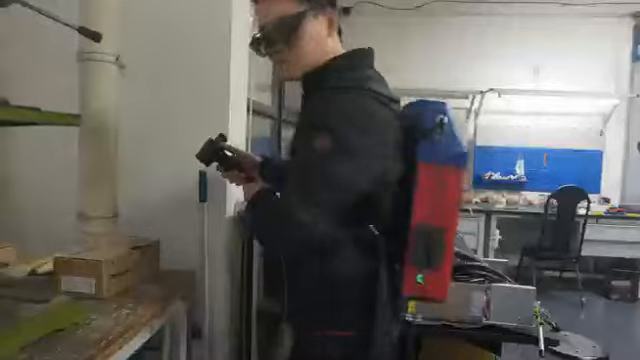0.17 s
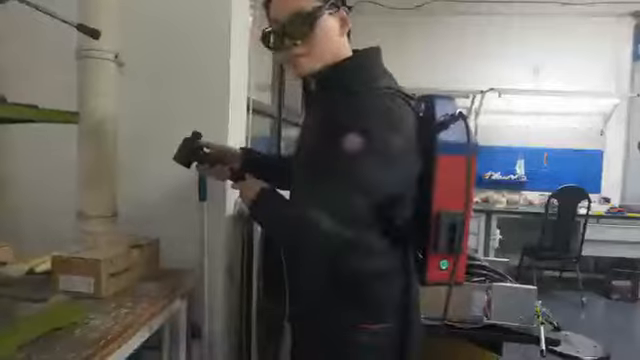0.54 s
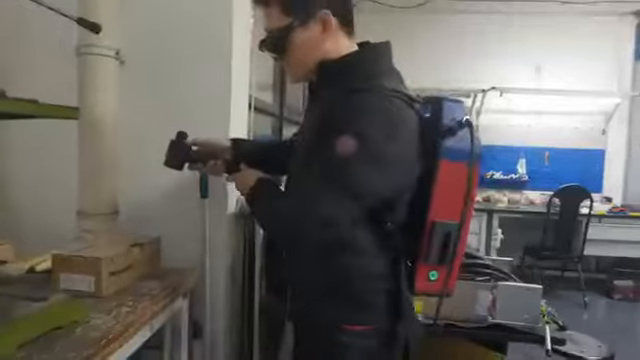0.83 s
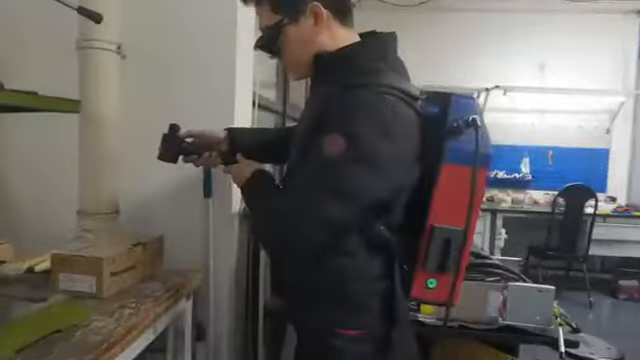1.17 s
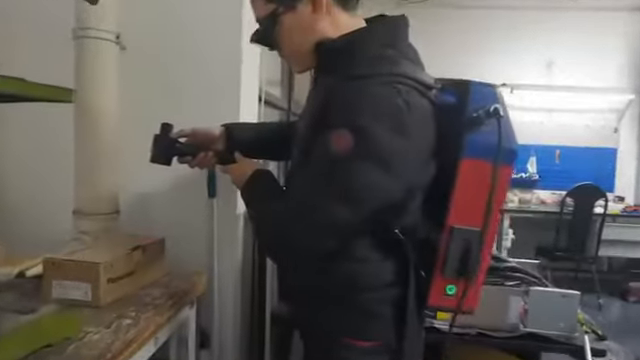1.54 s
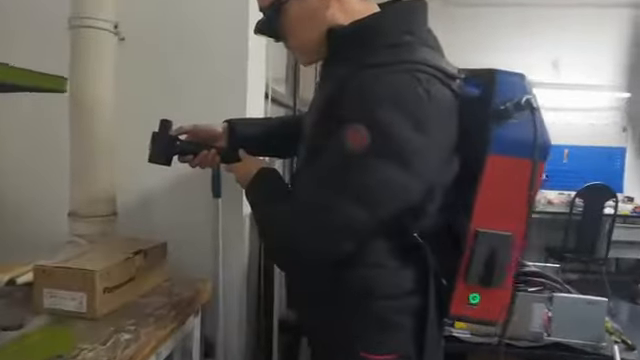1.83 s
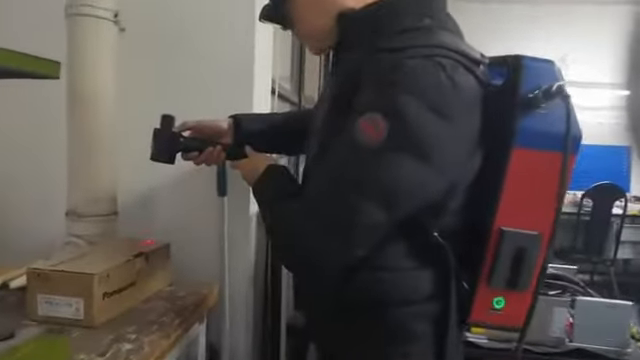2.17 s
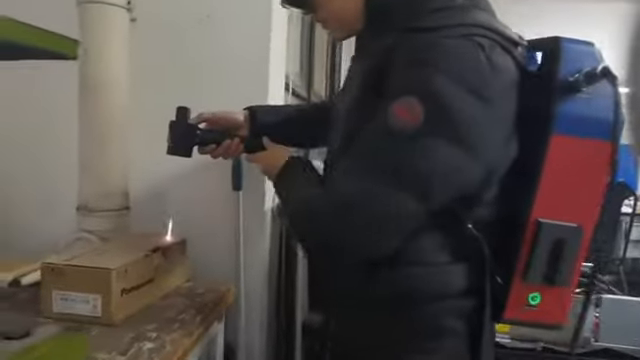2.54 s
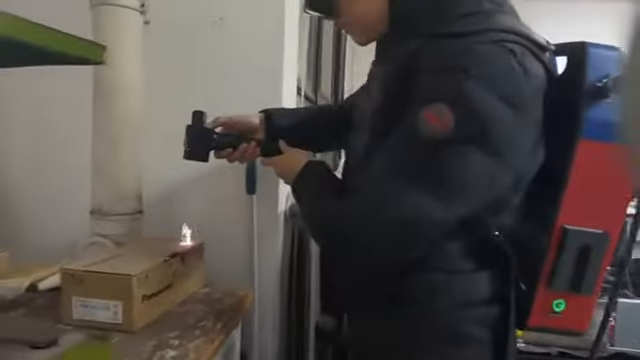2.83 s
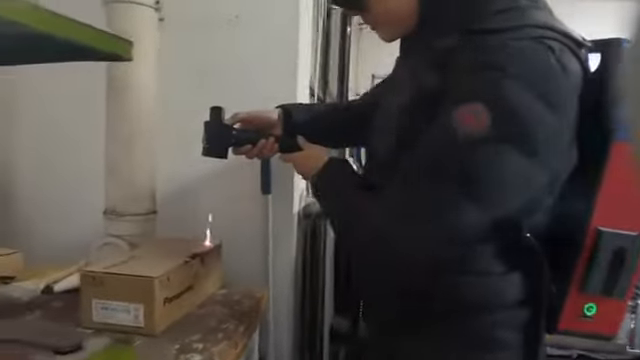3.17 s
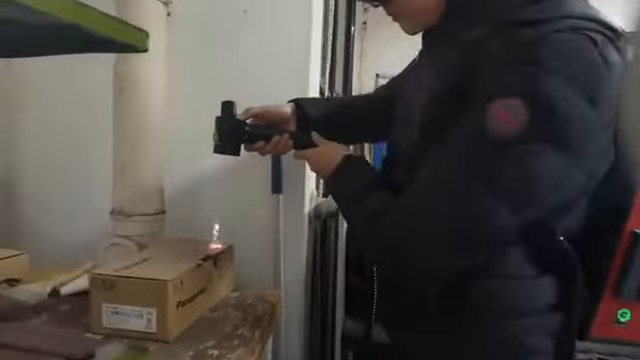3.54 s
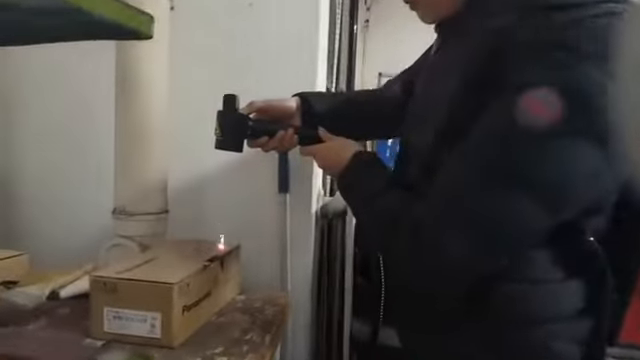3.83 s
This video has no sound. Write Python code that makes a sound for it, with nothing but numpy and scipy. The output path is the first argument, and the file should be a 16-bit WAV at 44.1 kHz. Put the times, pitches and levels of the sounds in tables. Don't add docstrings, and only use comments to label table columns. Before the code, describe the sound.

Laser burning cardboard: a gritty electric buzz starts past halfway, fades, catches again and ends loudest. Before and beneath it, a low pulsing fan hum, thin whine and airy rush in a short, close workshop room.

```python
import sys
import numpy as np
from scipy import signal
from scipy.fft import rfft, irfft, next_fast_len
from scipy.io import wavfile
from scipy.ndimage import uniform_filter1d

SR = 44100
rng = np.random.default_rng(int(sys.argv[2]) if len(sys.argv) > 2 else 0)


def rack_gain(trim_db):
    fader = np.asarray(trim_db, float)
    return 10 ** (fader / 20)


def bounce(signal):
    frames = np.transpose(np.atleast_2d(signal))
    limited = np.clip(frames, -1, 1)
    pcm = np.round(limited * 32767).astype(np.int16)
    wavfile.write(sys.argv[1], SR, pcm)


N = 176400
T = np.arange(N) / SR

# (frequency [Hz], likeness [0 to 1])
LIKENESS = [(70, .97), (130, .84), (280, .85), (600, .7), (1000, .1), (7000, 0), (8500, .9)]


def rms_one(x):
    return x / np.sqrt(np.mean(x ** 2) + 1e-20)


def in_time(rows):
    s, *columns = np.transpose(rows)
    return [np.interp(T, s, column) for column in columns]


def at_hz(points, hz):
    table_hz, values = np.transpose(points)
    return np.interp(np.log(hz), np.log(table_hz), values)


def drift(rate):
    r = np.exp(-80 * np.pi * rate / SR)
    noise = rng.standard_normal(N // 40 + 2002)
    slow = rms_one(signal.lfilter([1], [1, -2 * r, r * r], noise)[2000:])
    return np.interp(np.arange(N) / 40, np.arange(len(slow)), slow)


def filtered(x, response):
    size = next_fast_len(N + SR // 2)
    hz = np.arange(1, size // 2 + 2) * SR / size
    return irfft(rfft(x, size) * response(hz), size)[..., :N]


def pair(mid, side, alike):
    alike = np.clip(alike, 0, 1)
    return np.sqrt((1 + alike) / 2) * mid + np.sqrt((1 - alike) / 2) * side * [[1], [-1]]


def narrow(hz, width_hz):
    shape = lambda f: 1 / (1 + ((f - hz) / width_hz * 2) ** 2)
    mid, side = filtered(rng.standard_normal((2, N)), shape)
    return rms_one(pair(mid, side, at_hz(LIKENESS, hz)))


def air():
    # (frequency [Hz], level [dB per Hz])
    rush_colour = [(25, -15.5), (150, -3.5), (600, -8), (1250, -15), (2300, -18.5), (2900, -21),
                   (6000, -23.5), (7800, -39.5)]
    low_cut_hz = 30

    def share(f, sign):
        colour = rack_gain(at_hz(rush_colour, f) - 41 * (f > 8000)) / (1 + (low_cut_hz / f) ** 4)
        return colour * np.sqrt((1 + sign * np.clip(at_hz(LIKENESS, f), 0, 1)) / 2)

    mid, side = rng.standard_normal((2, N))
    rush = filtered(mid, lambda f: share(f, 1)) + filtered(side, lambda f: share(f, -1)) * [[1], [-1]]
    hiss = filtered(rng.standard_normal((2, N)), lambda f: 1 / (1 + (7000 / f) ** 8))
    rush_db = -49 + 0.5 * T + 0.81 * drift(1.5)
    hiss_db = -67.5 - 1.5 * np.minimum(T, 2.3)
    return rack_gain(rush_db) * rms_one(rush) + rack_gain(hiss_db) * pair(*hiss, 0.9)


def big_fan():
    # (time [s], peak level [dB], pitch [Hz])
    throb = [(0.259, -34.5, 285.4), (0.299, -32.5, 287.4), (0.354, -31, 288.3), (0.409, -41, 274.6),
             (0.477, -32.5, 275), (0.52, -43, 276.5), (0.582, -41, 276.9), (0.653, -48, 280.2),
             (0.699, -37, 285.2), (0.773, -36, 280.3), (0.83, -36.5, 270.2), (0.979, -25.5, 272.6),
             (1.017, -32.2, 285), (1.081, -32, 285.6), (1.136, -31.5, 283.3), (1.174, -30, 288),
             (1.209, -26, 282.3), (1.284, -33.5, 272.6), (1.314, -34, 276), (1.366, -33.5, 273.8),
             (1.423, -36.5, 269), (1.457, -33, 273), (1.492, -34, 282), (1.545, -41, 277.6),
             (1.571, -37, 280), (1.631, -35, 284), (1.683, -45, 273), (1.718, -38, 287), (1.805, -35, 287),
             (1.854, -31.5, 278), (1.888, -33, 279.2), (1.925, -36.5, 284.3), (2.028, -31.5, 278),
             (2.106, -26, 271.5), (2.173, -29.5, 282.2), (2.248, -41.5, 278.2), (2.329, -37.5, 284.8),
             (2.401, -41, 286), (2.565, -35, 284), (2.619, -39, 278.9), (2.732, -43, 296.3),
             (3.009, -37, 281), (3.108, -37.3, 281), (3.195, -32.6, 267.8), (3.285, -37.5, 268.7),
             (3.32, -37.9, 264), (3.372, -37.4, 267.5), (3.441, -32, 269), (3.484, -44, 291),
             (3.589, -39.5, 280), (3.707, -39, 267), (3.85, -33.4, 267.6)]
    gust_s = 0.012
    _, gust_hz = in_time(throb)
    swell = np.sqrt(sum(rack_gain(2 * db) * np.exp(-((T - s) / gust_s) ** 2) for s, db, _ in throb))
    ear_shift = np.array([[-.12], [.12]]) * (1 + drift(2.8))
    gusts = swell * np.sin(2 * np.pi * np.cumsum(gust_hz) / SR + ear_shift)

    housing = narrow(277.2, 63.5)
    blades = rack_gain(-19.5) * narrow(286.3, 1.7)
    rumble_db = -44.5 - 1 * T
    return gusts + rack_gain(rumble_db) * rms_one(housing + blades)


def small_fans():
    # (time [s], first fan level [dB], second fan level [dB])
    whine = [(0.25, -50, -52), (0.33, -47, -44), (0.66, -52, -52), (0.7, -46.5, -48), (1.53, -49.5, -54),
             (1.61, -54, -72), (1.65, -52.5, -61), (2.01, -54, -50), (2.19, -45.5, -44),
             (2.33, -52.5, -47.5), (2.65, -50.5, -39.5), (2.74, -48, -49.5), (2.91, -53, -45),
             (3.03, -45, -40), (3.14, -53, -54), (3.35, -51.5, -40), (3.39, -47.5, -48.5), (4.0, -49, -48)]
    # (frequency [Hz], level at start [dB], level at end [dB], width [Hz])
    tones = [(544, -1, -9, 6.8), (559.2, -1.5, -1.1, 3.77), (587, -0.5, 0.05, 2.5),
             (189.7, -26.5, -11.5, 5.3), (98.6, -25.5, -12, 11.5), (40.5, -20, -9, 13),
             (1650, -17.5, -25, 69), (1740, -20.5, -37, 11), (2246, -19, -24.5, 84),
             (946.5, -21.5, -13, 38)]
    skirt_db, skirt_hz = -9, 36
    squeal_s, squeal_span_s = 2.04, 0.19
    first_fan_db, second_fan_db = in_time(whine)

    squeal_db = -55 - 10 * ((T - squeal_s) / squeal_span_s) ** 2
    total = rack_gain(squeal_db) * narrow(2190, 12)
    for hz, start_db, end_db, width_hz in tones:
        if hz > 900 or hz < 150:
            tone = narrow(hz, width_hz)
        else:
            turns = np.cumsum(hz + width_hz / 2 * drift(3 + width_hz)) / SR
            ear_turns = rng.random((2, 1)) * (1 - at_hz(LIKENESS, hz))
            tone = np.sin(2 * np.pi * (turns + ear_turns)) * np.sqrt(2)
            tone = tone + rack_gain(skirt_db) * narrow(hz, skirt_hz)
        if 500 < hz < 575:
            load_db = first_fan_db
        elif 575 < hz < 700:
            load_db = second_fan_db
        else:
            load_db = -45
        tone_db = start_db + (end_db - start_db) * T / 4 + 1.5 * drift(5)
        total = total + rack_gain(tone_db + load_db) * tone
    return rack_gain([[.5], [-.5]]) * total


def laser():
    # (time [s], level [dB], brightness [dB])
    bouts = [
        [(2.355, -51, 5), (2.373, -32.5, 11), (2.385, -38.5, 0)],
        [(2.385, -38, 10), (2.433, -34.5, 6.5), (2.481, -41.5, 7.5), (2.5, -42, 16)],
        [(2.5, -39, 8.5), (2.666, -33, 8), (2.7, -35, 18)],
        [(2.7, -31.5, 8), (2.83, -36.5, 1), (2.85, -34, 9), (2.932, -42.5, 6), (2.95, -32.5, 3)],
        [(2.95, -34, 7), (2.984, -31.5, 0), (3.022, -38, 3), (3.05, -32, 8)],
        [(3.05, -28, 9), (3.06, -29, 10), (3.1, -37.5, 3)],
        [(3.1, -39, 5), (3.158, -55.5, 17.5), (3.26, -50, 18), (3.286, -56, 15), (3.3, -49, 14)],
    ]
    # (time [s], level [dB], brightness [dB])
    late_bouts = [
        [(3.3, -52, 12), (3.312, -40, 14.5), (3.358, -36.5, 12.5), (3.39, -47, 15), (3.4, -44, 9)],
        [(3.4, -39, 7), (3.406, -36.5, 17), (3.422, -31.5, 8.5), (3.532, -58.5, 14), (3.622, -58, 17),
         (3.68, -58, 25)],
        [(3.68, -53, 16), (3.706, -35.5, 5.5), (3.76, -27.5, 5.5), (3.79, -48.5, -6)],
        [(3.79, -34, 16), (3.8, -30.5, -1), (3.858, -36, 3.5), (3.88, -51, -12)],
        [(3.88, -34, 13), (3.892, -30.5, 5.5), (3.954, -23.5, 4), (4.0, -26, 6.5)],
    ]
    # (frequency [Hz], level [dB per Hz])
    snap_colour = [(700, -16.5), (1300, -3.5), (2200, -3), (2750, 5.5), (3900, 5.5), (6000, 5), (8500, -8),
                   (14800, -1)]
    sweep_hz, sweep_depth = 218.4, 0.1
    memory_low, memory_high, memory_hz = 0.46, 0.2, 8000
    hollow_hz, hollow_width_hz, hollow_db = 2800, 350, -8
    snaps_per_s, snap_spread_db = 10000, 3.1
    bright_hz, patch_db, flicker_db = 9000, 1.1, 2

    rows = [(2.34, -110, 0.018)]
    for bout in bouts + late_bouts:
        rows = rows + list(bout)
    level_db, bright_db = in_time(rows)
    sizes = rack_gain(snap_spread_db * np.minimum(rng.exponential(1, N), 5)) * rng.choice([-1, 1], N)
    snaps = sizes * (rng.random(N) < snaps_per_s / SR)

    def sweeps(f):
        keep = memory_high + (memory_low - memory_high) / (1 + (f / memory_hz) ** 8)
        keep = np.clip(keep, 0, .9)
        hollow = hollow_db / (1 + ((f - hollow_hz) / hollow_width_hz) ** 4)
        echoes = np.sqrt(1 - keep ** 2) / (1 - keep * np.exp(-2j * np.pi * f / sweep_hz))
        return rack_gain(at_hz(snap_colour, f) + hollow) * echoes

    run = rms_one(filtered(snaps, sweeps)) * (1 + sweep_depth * np.cos(2 * np.pi * sweep_hz * T))
    burn = 0
    for octave in np.arange(np.log2(500), np.log2(20000), 1 / 3):
        band = filtered(run, lambda f: np.clip(1 - 3 * np.abs(np.log2(f) - octave), 0, 1))
        lift_db = bright_db / (1 + (bright_hz / 2 ** octave) ** 4)
        burn = burn + band * rack_gain(patch_db * drift(3.3) + lift_db)
    return burn * rack_gain(level_db + flicker_db * drift(90))


def workshop(x):
    left_lag_s, left_db = -.00012, 3
    room_db, room_t60_s = 1.5, 0.055
    wander_turns = 0.7
    t = np.arange(SR // 4) / SR
    tail = rng.standard_normal((2, 2, len(t))) * rack_gain(-60 * t / room_t60_s) * (t > .003)
    tail = tail / np.sqrt(np.sum(tail ** 2, axis=2, keepdims=True))
    angle = 2 * np.pi * wander_turns * (T + 0.4 * drift(3.3))
    spots = x * np.array([[np.cos(angle)], [np.sin(angle)]])
    wet = signal.fftconvolve(spots, tail, axes=2).sum(axis=0)[:, :N]

    def lag(f):
        return np.exp(-2j * np.pi * np.minimum(f * abs(left_lag_s), 1.17) * np.sign(left_lag_s))

    def lean(f):
        return rack_gain(np.array([[1], [-1]]) * left_db / 2 / (1 + (f / 7500) ** 6))

    direct = np.array([filtered(x, lag), x])
    both = (direct + rack_gain(room_db) * wet) / np.sqrt(1 + rack_gain(room_db) ** 2)
    return filtered(both, lean)


def patchy_bands(x):
    # (start [s], end [s], low edge [Hz], high edge [Hz])
    dropouts = [(2.36, 2.46, 15200, 17000), (2.44, 2.465, 14300, 17000), (2.44, 2.58, 14700, 15200),
                (2.555, 2.715, 15400, 17000), (2.67, 2.715, 14600, 15400), (2.39, 2.51, 9100, 9500),
                (2.415, 2.44, 8200, 9200), (2.56, 2.65, 9100, 9500), (2.625, 2.65, 7000, 7400),
                (2.67, 2.745, 7700, 8100), (2.69, 2.715, 8000, 8700), (2.74, 2.765, 7000, 7400),
                (2.76, 2.79, 8900, 9400), (2.81, 2.855, 7700, 8100), (2.855, 2.905, 9000, 9500),
                (2.855, 2.905, 11200, 11800), (2.875, 2.93, 12500, 12950), (2.945, 3.0, 9800, 10300),
                (3.015, 3.045, 6400, 6750), (3.065, 3.115, 10700, 11600), (3.175, 3.21, 6800, 7400),
                (3.205, 3.23, 10500, 11100), (3.295, 3.365, 10900, 12200), (3.39, 3.465, 13200, 13600),
                (3.405, 3.465, 7100, 7400), (3.57, 3.62, 11900, 12300), (3.57, 3.62, 7100, 7400),
                (2.48, 2.51, 2600, 2800), (2.55, 2.585, 3200, 3370), (2.625, 2.655, 2950, 3100),
                (2.65, 2.72, 2620, 2780), (2.75, 2.79, 2950, 3350), (3.92, 3.96, 10600, 11200),
                (3.95, 3.99, 9600, 10200)]
    rough_db, loud_above_db, mottle_db = 3, -78, 3
    drop_share, cutoff_hz = 0.02, 15800
    f, t, z = signal.stft(x, SR, nperseg=1024, noverlap=896)
    frame = np.arange(len(t)) // 8
    bins = f[:512]
    power = np.sum(np.abs(z[:, :512, ::8]) ** 2, axis=0)
    power = power.reshape(64, 8, -1).mean(axis=1) / 2
    bands, frames = power.shape
    hz = f[4:512:8, None]
    loud = 10 * np.log10(power[8:44].mean(axis=0) + 1e-20) > loud_above_db

    own = uniform_filter1d(rng.standard_normal((bands, frames)), size=3, axis=1)
    shared = rng.standard_normal((32, frames)).repeat(2, axis=0) / 2
    luck = rms_one(own + shared)
    start = rng.random((bands, frames)) < drop_share * (hz > 6800) * (hz < 13500)
    drop = start | np.roll(start & loud, 1, axis=1)
    error_db = rough_db * luck * np.where(loud, 1.1, .7) * (hz > 6800)
    rough = np.repeat(rack_gain(error_db) * ~drop, 8, axis=0)

    fine = uniform_filter1d(rng.standard_normal((256, frames)), size=2, axis=1)
    fine = rms_one(fine).repeat(2, axis=0)
    middle = ((bins > 700) & (bins < 6800))[:, None]
    gain = (rough * rack_gain(mottle_db * fine * middle))[:, frame]
    for first_s, last_s, low_hz, high_hz in dropouts:
        lost_bins = (bins >= low_hz - 90) & (bins <= high_hz + 90)
        lost_times = (t > first_s - .02) & (t < last_s + .02)
        gain[np.ix_(lost_bins, lost_times)] = 0
    z[:, :512] *= gain
    return signal.istft(z * (f < cutoff_hz)[:, None], SR, nperseg=1024, noverlap=896)[1][:, :N]


def scene():
    return workshop(laser()) + big_fan() + small_fans() + air()


def band_limit(x):
    return signal.sosfilt(signal.butter(12, 16920, fs=SR, output="sos"), x)


def record(dry):
    start_s, fade_s = 0.23, 0.066
    fade = np.clip((T - start_s) / fade_s, 0, 1) ** 0.62
    return band_limit(patchy_bands(dry) * fade)


dry = scene()
out = record(dry)
bounce(out)
```